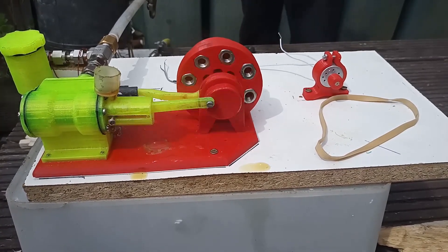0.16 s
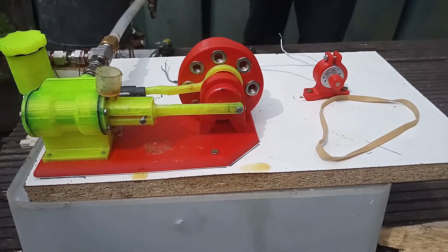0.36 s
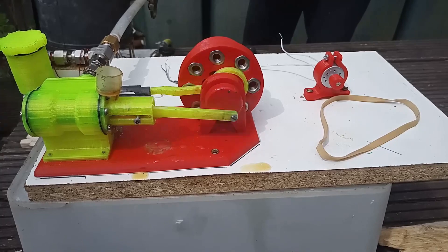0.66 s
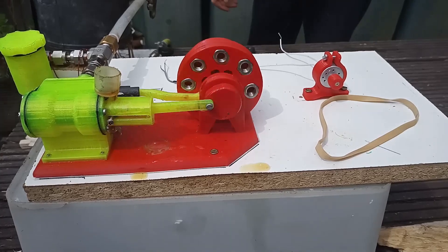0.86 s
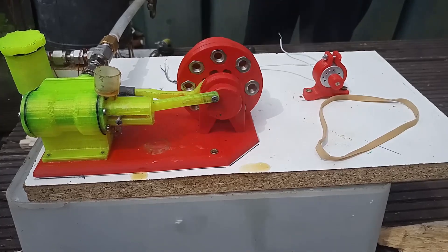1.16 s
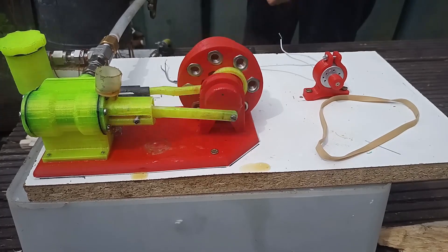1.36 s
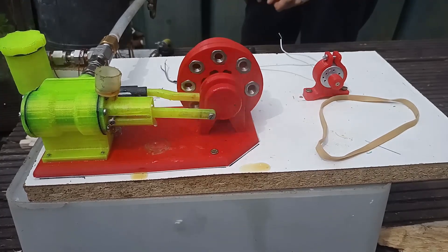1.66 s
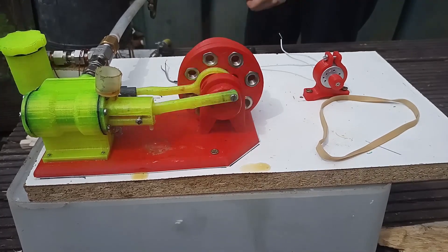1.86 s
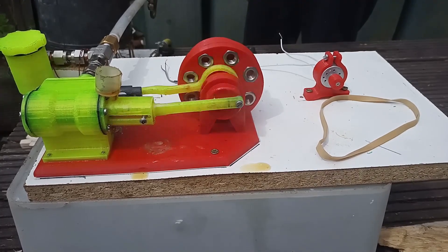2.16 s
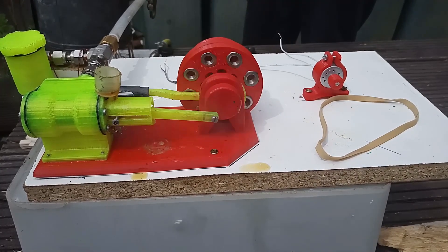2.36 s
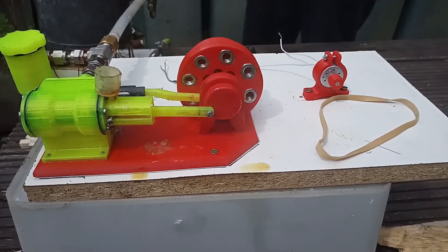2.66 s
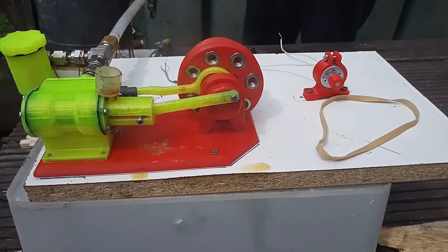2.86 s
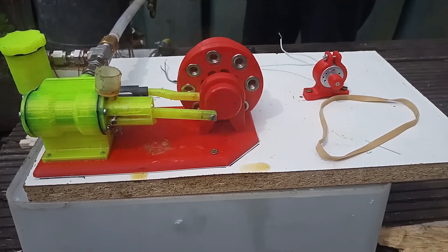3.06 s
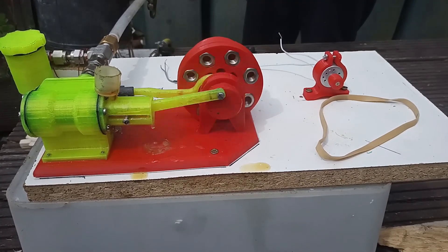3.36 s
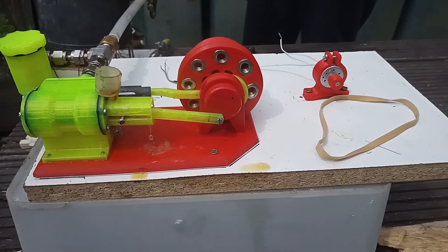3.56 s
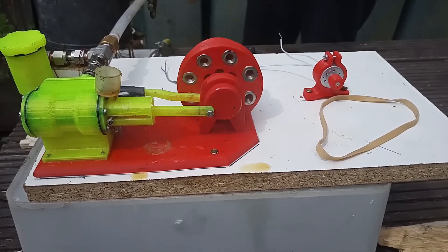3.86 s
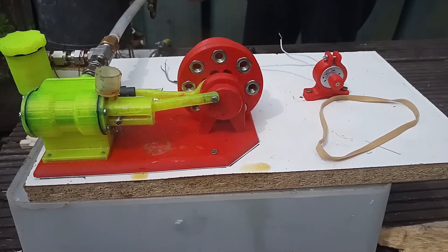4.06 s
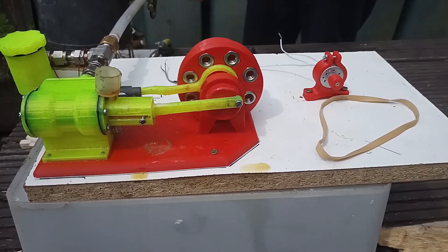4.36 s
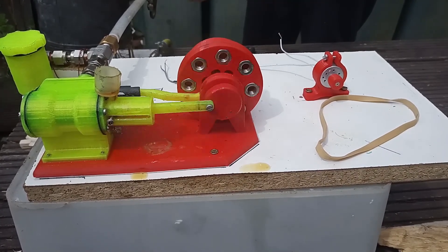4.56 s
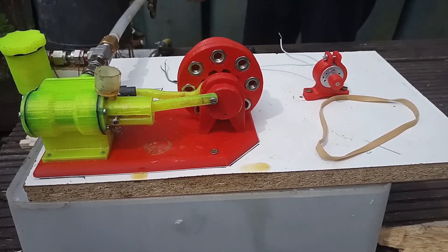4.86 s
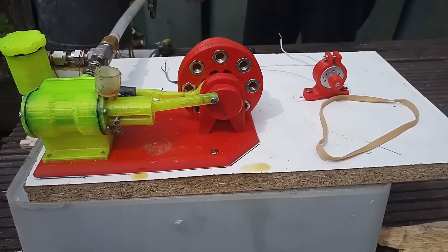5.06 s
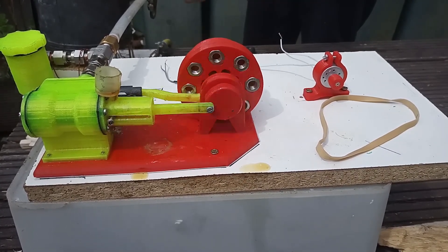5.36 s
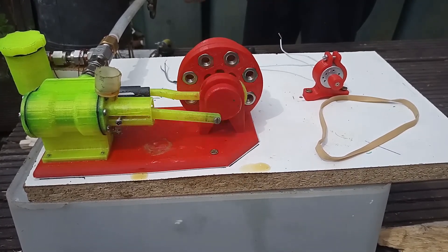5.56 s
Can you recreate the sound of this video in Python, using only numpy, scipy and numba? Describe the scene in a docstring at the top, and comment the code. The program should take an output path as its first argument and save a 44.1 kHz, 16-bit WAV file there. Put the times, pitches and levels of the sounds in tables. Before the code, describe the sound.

Quick, even puffs of wet hissing steam come from a small engine on a board, along with soft piston rubbing and rattling rods. The rhythm drags and breaks off for a moment, exposing a steady leak and a thin high whistle. A short hollow whoosh follows and the puffing starts again. It is heard from close by in the open air, with soft low wind bumps on the microphone.

```python
"""Small steam engine nearly stalling

A single-cylinder engine runs on a board at about seven turns a second, slows, nearly stalls
and picks up again. Once a turn the valve opens: a thin bright jet, then a wet sputtering rush.
The piston rubs and the loose linkage knocks at fixed crank angles.
A leak hisses all the time, and moving air rumbles on the microphone."""
import sys
import numpy as np
from scipy import signal
from scipy.fft import rfft, irfft
from scipy.io import wavfile
from scipy.ndimage import uniform_filter1d
from numba import njit

SR = 44100
rng = np.random.default_rng(int(sys.argv[2]) if len(sys.argv) > 2 else 0)


def inscribe(sig):
    """Save sig as 16-bit PCM at rate SR to the path in sys.argv[1].

    A 1-D sig is mono; a 2-D sig holds one channel per row.
    Samples are clipped to [-1, 1] before scaling.
    """
    pcm = np.round(np.clip(np.atleast_2d(sig).T, -1, 1) * 32767)
    wavfile.write(sys.argv[1], SR, pcm.astype(np.int16))


N = 252252
TIME = np.arange(N) / SR


def from_db(db):
    """Decibels to gain."""
    return 10 ** (np.asarray(db) / 20)


def unit_rms(x):
    """Scale to rms 1."""
    return x / np.sqrt(np.mean(x ** 2) + 1e-20)


def gain_along(rows_db, where):
    """Gain interpolated from rows of (position, level [dB])."""
    return from_db(np.interp(where, *np.transpose(rows_db)))


def butter(x, order, hz, kind):
    """Butterworth low- or high-pass."""
    return signal.sosfilt(signal.butter(order, hz, kind, fs=SR, output="sos"), x)


def noise(spectrum):
    """Noise of a given spectrum, falling 20 dB an octave beyond its ends; rms 1."""
    hz, db = np.transpose(spectrum)
    octave, points = np.log2(np.arange(N // 2 + 1) * SR / N + 1), np.log2(hz)
    outside = np.abs(octave - np.clip(octave, points[0], points[-1]))
    shape = from_db(np.interp(octave, points, db) - 20 * outside)
    return unit_rms(irfft(rfft(rng.standard_normal(N)) * shape, N))


def flutter(rate_hz, depth_db):
    """Factor wandering at random about 1."""
    r = np.exp(-2 * np.pi * rate_hz / SR)
    slow = signal.lfilter([1], [1, -2 * r, r * r], rng.standard_normal(N + SR))[SR:]
    return from_db(depth_db * unit_rms(slow))


def grains(per_s, spread_db):
    """Random clicks of uneven size and sign."""
    clicks = (rng.random(N) < per_s / SR) * rng.choice([-1, 1], N)
    return clicks * from_db(spread_db * np.minimum(rng.exponential(1, N), 4))


def impulses(times_s, sizes):
    """Single clicks at the given times."""
    out = np.zeros(N)
    inside = (times_s > 0) & (times_s < TIME[-1])
    out[(times_s[inside] * SR).astype(int)] = sizes[inside]
    return out


def bursts(clicks, length_s):
    """Each click becomes a rounded burst of noise."""
    shape = np.sin(np.pi * np.minimum(TIME[:SR // 20] / length_s, 1)) ** 2
    return signal.fftconvolve(clicks, shape)[:N] * rng.standard_normal(N)


def ring(clicks, hz, t60_s):
    """Each click starts a decaying sine."""
    r, w = np.exp(-np.log(1000) / (t60_s * SR)), 2 * np.pi * hz / SR
    return signal.lfilter([0, np.sin(w)], [1, -2 * r * np.cos(w), r * r], clicks + 1e-18)


def resonate(x, modes):
    """Parallel resonances of alternating sign."""
    out = 0
    for k, (hz, width_hz, db) in enumerate(modes):
        r = np.exp(-np.pi * width_hz / SR)
        poles = [1, -2 * r * np.cos(2 * np.pi * hz / SR), r * r]
        band = (1 - r * r) / 2 * signal.lfilter([1, 0, -1], poles, x + 1e-18)
        out = out + (-1) ** k * from_db(db) * band
    return out


@njit
def glide(x, angle, r):
    """Resonance with a moving centre, angle in radians a sample."""
    out = np.zeros(len(x))
    for i in range(2, len(x)):
        drive = (1 - r * r) / 2 * (x[i] - x[i - 2])
        out[i] = drive + 2 * r * np.cos(angle[i]) * out[i - 1] - r * r * out[i - 2]
    return out


def hollow(x, hz, width_hz):
    """Twice through a moving resonance; rms 1."""
    angle, r = 2 * np.pi * hz / SR, np.exp(-np.pi * width_hz / SR)
    return unit_rms(glide(glide(x, angle, r), angle, r))


def buffet(start_s, db, hz, rise_s=0.0064):
    """A lump of air: a few slow swings that swell and die."""
    age_s = np.maximum(TIME - start_s, 0)
    swell = age_s / rise_s * np.exp(1 - np.minimum(age_s / rise_s, 20))
    return from_db(db) * swell * np.sin(2 * np.pi * hz * age_s)


# rumble spectrum: (frequency [Hz], relative density [dB])
WIND_SPECTRUM = [(20, -34), (40, -1.5), (70, 4.5), (95, -1), (135, 0), (190, -10.5), (280, -28), (420, -12)]
# breeze strength: (time [s], relative level [dB])
WIND_LEVEL = [(0, -40.5), (.12, -43.5), (.23, -69), (.32, -51.5), (.8, -48.5), (1.03, -70), (1.26, -68),
              (1.39, -45), (1.8, -52.5), (2.15, -53), (2.68, -62), (2.86, -55.5), (3.18, -54.5),
              (3.7, -67.5), (4.1, -68.5), (4.42, -59), (4.9, -62), (5.72, -48.5)]
# single buffets: (time [s], relative peak [dB], pitch [Hz])
WIND_BUFFETS = [(0.021, -38.5, 124), (0.084, -34.5, 73.5), (0.108, -35.5, 104), (0.284, -40.5, 82),
                (0.432, -38, 95), (0.519, -41, 75.4), (0.713, -40.5, 93), (1.614, -48, 80.7),
                (1.97, -41, 91.5), (2.054, -38, 116), (2.081, -34, 77), (2.801, -44, 84.5),
                (3.118, -42, 78.1), (3.466, -41, 73.4), (4.204, -43, 69), (4.372, -41.5, 70.6),
                (4.601, -41.5, 105), (4.635, -37.5, 86.1), (4.92, -47.5, 109), (5.011, -34, 83),
                (5.096, -31.5, 101), (5.16, -37, 68.4), (5.493, -38.5, 64.6)]


def wind():
    """Air on the microphone: lumpy low rumble and single buffets."""
    thumps = from_db(-1) * sum(buffet(*row) for row in WIND_BUFFETS)
    gusts = from_db(-1.5) * gain_along(WIND_LEVEL, TIME)
    rumble = gusts * noise(WIND_SPECTRUM) * flutter(rate_hz=4.3, depth_db=3)
    return butter(butter(rumble + thumps, 4, 240, "low"), 2, 38, "high")


# hiss spectrum: (frequency [Hz], relative density [dB])
LEAK_SPECTRUM = [(600, -31.5), (1550, -39), (1870, -22), (2130, -26.5), (2600, -9), (3300, -8), (4100, 2),
                 (5000, -3), (6200, -10), (7200, -21), (8600, -45), (10500, -25), (15500, -39)]
# faint whistles: (frequency [Hz], width [Hz], gain per pass [dB])
LEAK_MODES = [(1887, 110, -6), (3230, 44, 1.5), (3530, 98, 0.7), (4027, 110, 3)]


def leak():
    """Steam escapes steadily from the fittings."""
    hiss = from_db(-50) * noise(LEAK_SPECTRUM)
    whistles = unit_rms(resonate(resonate(rng.standard_normal(N), LEAK_MODES), LEAK_MODES))
    return (hiss + from_db(-57.5) * whistles) * flutter(rate_hz=8.4, depth_db=1)


# sizzle past the valve: (time [s], level [dB])
SEEP_LEVEL = [(4.6, -83), (4.66, -68), (4.9, -64.5), (4.97, -64), (5.15, -62), (5.3, -61), (5.36, -81)]
# valve gap resonances: (frequency [Hz], width [Hz], gain [dB])
SEEP_MODES = [(8500, 890, 0), (9450, 900, 0), (13000, 3600, -10)]
# thin whistle: (time [s], level [dB], pitch [Hz])
SEEP_WHISTLE = [(4.85, -85, 8700), (4.94, -73, 8650), (4.975, -61, 8500), (5.04, -75, 8250),
                (5.13, -70, 8600), (5.28, -90, 8600)]


def seep():
    """Steam sizzles and whistles past the valve while the piston is nearly still."""
    sizzle = butter(resonate(grains(per_s=2900, spread_db=-1), SEEP_MODES), 2, 5000, "high")
    times_s, db, hz = np.transpose(SEEP_WHISTLE)
    whistle = hollow(rng.standard_normal(N), np.interp(TIME, times_s, hz), width_hz=530)
    whistle *= from_db(np.interp(TIME, times_s, db))
    return gain_along(SEEP_LEVEL, TIME) * unit_rms(sizzle) + whistle


# base and board resonances: (frequency [Hz], width [Hz], gain per pass [dB])
BOARD_MODES = [(257.2, 74, 0.5), (332.6, 81, -1), (495, 102, -5.5), (707, 153, -4.5), (1820, 930, -5.5),
               (3000, 1250, -6.5)]
# board rumble at normal speed: (time [s], relative level [dB])
BOARD_LEVEL = [(0, -52.5), (.28, -66), (.5, -56.5), (.78, -62.5), (1.3, -55), (1.65, -55.5), (2.0, -57),
               (2.2, -64.5), (2.85, -54), (3.6, -57.5), (4.1, -60.5), (4.5, -58.5), (5.4, -51),
               (5.72, -62.5)]


def rubbing(turns, speed, pressure_db):
    """Tiny slips of piston and slides ring the board and the hollow cylinder body."""
    pace = uniform_filter1d(speed, size=4000)
    sliding = np.minimum(pace / 0.43, 1) ** 7.1   # a slow piston sticks and falls quiet
    load = gain_along([(0, -1.5), (.35, -2.5), (.68, 2), (.8, -6.5), (1, -13)], turns % 1)
    load **= 1 / np.clip(pace, .5, 1)   # deeper lulls on slow turns
    board = unit_rms(resonate(resonate(grains(per_s=2500, spread_db=2.5), BOARD_MODES), BOARD_MODES))
    board *= gain_along(BOARD_LEVEL, TIME) * pace ** 2.03
    barrel_hz = 939 * flutter(rate_hz=9, depth_db=.4)
    barrel = hollow(grains(per_s=2800, spread_db=4.5), barrel_hz, width_hz=112)
    barrel *= from_db(-58 + .5 * pressure_db) * flutter(rate_hz=40, depth_db=1.5)
    return sliding * load * (board + barrel)


def contacts(turns, speed, phase, jitter_s, spread_db):
    """One blow a turn at a crank phase, softer below normal speed."""
    due_turns = np.arange(-1, np.ceil(turns[-1])) + phase
    timing, strength = rng.standard_normal((len(due_turns), 2)).T
    times_s = np.interp(due_turns, turns, TIME) + jitter_s * timing
    force = np.interp(times_s, TIME, np.minimum(speed, 1)) ** 3.7
    reached = (due_turns > turns[0]) & (due_turns < turns[-1])
    return impulses(times_s, force * reached * from_db(spread_db * strength))


# play in the linkage: (crank phase [turns], relative level [dB], pitch [Hz], t60 [s])
LINKAGE_KNOCKS = [(.06, -44.5, 1683, 0.03), (0.115, -48.5, 955, 0.038), (.185, -39, 1940, 0.016),
                  (0.298, -48, 288, 0.032), (0.37, -51, 2830, 0.019), (0.52, -58, 605, 0.02),
                  (0.585, -47.5, 260, 0.018), (0.575, -48, 1846, 0.048), (.64, -44.5, 914, 0.022),
                  (0.656, -51.5, 680, 0.038), (0.755, -51.5, 580, 0.048), (0.851, -47, 1523, 0.038),
                  (.885, -51, 900, 0.022), (.89, -53.5, 572, 0.022)]
# valve gear scrapes: (crank phase [turns], relative level [dB])
GEAR_SCRAPES = [(.65, -7.5), (.76, -16), (0.835, -0.5)]
# valve gear resonances: (frequency [Hz], width [Hz], gain [dB])
GEAR_MODES = [(3040, 580, 3), (4550, 660, 5), (6200, 1100, 1.5), (9660, 720, -3), (12500, 3600, -16)]


def linkage(turns, speed):
    """Rod and eccentric take up their play with dull knocks; the valve gear ticks."""
    knocks = taps = 0
    for phase, db, hz, t60_s in LINKAGE_KNOCKS:
        blows = contacts(turns, speed, phase, jitter_s=0.0024, spread_db=2)
        knocks += from_db(db) * ring(blows, hz, t60_s)
    for phase, db in GEAR_SCRAPES:
        taps += from_db(db) * contacts(turns, speed, phase, jitter_s=0.0005, spread_db=2.2)
    ticks = resonate(bursts(taps, length_s=0.0093), GEAR_MODES)
    return from_db(-0.2) * knocks + from_db(-36) * ticks


# steam filling the cylinder: (time [s], relative level [dB])
INTAKE_LEVEL = [(0, -59), (1.4, -59.5), (3.5, -61.5), (4.05, -61), (4.3, -71), (4.6, -78), (5.2, -38),
                (5.3, -57), (5.42, -55), (5.65, -59)]


def intake(turns, lead_s=0.0337):
    """Steam enters just before each puff; the cavity's pitch falls as the piston draws back."""
    phase = np.interp(TIME + lead_s, TIME, turns) % 1
    # (phase [turns], cavity pitch [Hz], relative level [dB])
    at, hz, db = np.transpose([(0, 1670, -16), (.03, 1730, -2), (.22, 1670, -3), (.34, 1080, 1),
                               (.55, 960, -1), (.62, 780, 6.5), (.68, 700, -54), (1, 1610, -60)])
    cavity_hz = np.interp(phase, at, hz) * flutter(rate_hz=39, depth_db=1)
    cavity = hollow(rng.standard_normal(N), cavity_hz, width_hz=800)
    return gain_along(INTAKE_LEVEL, TIME) * from_db(np.interp(phase, at, db)) * cavity


# exhaust port resonances: (frequency [Hz], width [Hz], gain [dB])
PORT_MODES = [(4060, 410, -17), (4776, 374, 6), (5690, 780, -3), (6450, 210, 1.5), (9700, 8100, -16.5)]


def sputter(phase):
    """Droplets of condensate burst in the port and set it ringing."""
    wetness = gain_along([(0, -9.5), (.27, -1.5), (.39, 5), (.555, 3), (.625, -15),
                          (.64, -17), (1, -59)], phase)
    return wetness * unit_rms(resonate(grains(per_s=2500, spread_db=2.5), PORT_MODES))


# larger drops: (time [s], relative peak [dB])
PORT_DROPS = [(0.7186, -27), (1.2284, -22.5), (1.2865, -27), (1.4681, -30), (1.5584, -22), (1.89, -23),
              (2.8942, -24), (3.265, -22), (4.6074, -23.5), (5.4197, -25), (5.4306, -27)]


def drops():
    """Now and then a larger drop snaps out of the port."""
    times_s, db = np.transpose(PORT_DROPS)
    snaps = resonate(impulses(times_s, from_db(db)), PORT_MODES)
    return from_db(db.max() - 2) * snaps / np.abs(snaps).max()


# valve slit resonances: (frequency [Hz], width [Hz], gain [dB])
SLIT_MODES = [(6200, 720, -3), (8820, 600, 1.5), (10600, 600, -6)]


def slit(phase):
    """The valve hisses as it cracks open and again as it shuts, 0.6 turn later."""
    edges = gain_along([(0, -37), (.013, -2), (.1, -6), (.3, -37), (.565, -13.5), (.605, -2),
                        (.63, -24), (1, -38)], phase)
    return edges * unit_rms(resonate(rng.standard_normal(N), SLIT_MODES))


# whistles of the narrow jet: (frequency [Hz], width [Hz], gain [dB])
JET_MODES = [(8450, 1000, -22), (9880, 1300, 5.5), (12730, 140, 11.5), (13500, 410, 3), (13600, 310, -11),
             (14100, 750, 1), (16000, 860, 2.5)]


def jet(phase):
    """A thin hiss falls in pitch as the opening widens, over steady whistles."""
    narrow = gain_along([(0, -28), (.05, -16), (.085, 0), (.25, 0.5), (.34, -5), (.57, -18),
                         (.63, -50), (1, -24)], phase)
    sweep_hz = np.interp(phase, [.05, .2, .35, .55], [13500, 12250, 10400, 9500])
    sweep_hz /= flutter(rate_hz=4.1, depth_db=0.64)
    sweep = hollow(rng.standard_normal(N), sweep_hz, width_hz=2400)
    whistles = unit_rms(resonate(rng.standard_normal(N), JET_MODES))
    return narrow * unit_rms(whistles + from_db(-3.5) * sweep) * flutter(rate_hz=55, depth_db=2.5)


# exhaust rush spectrum: (frequency [Hz], relative density [dB])
RUSH_SPECTRUM = [(500, -49), (700, -23), (950, -4), (1270, -12.5), (1650, -1), (2500, -10), (3600, -7),
                 (4800, -0.5), (6400, -0.5), (7300, -9), (9300, -10), (11500, -18.5)]


def rush(phase, pace):
    """Broad noise of outflowing steam, growing with speed."""
    flow = gain_along([(0, -10.5), (.03, -2.5), (.12, -1.5), (.33, -6), (.4, -4), (.595, -4),
                       (.645, -10.5), (.72, -15.5), (1, -14.5)], phase)
    return pace ** 0.57 * flow * noise(RUSH_SPECTRUM) * flutter(rate_hz=270, depth_db=3)


def exhaust(turns, speed, pressure_db, lead_turns=.014):
    """Dry steam whistles through the narrow opening first; the piston then pushes out wet steam."""
    phase = (turns + lead_turns) % 1
    pace = uniform_filter1d(speed, size=1500)
    dry_db = -45.5 + .5 * pressure_db
    broad = from_db(dry_db + 2) * rush(phase, pace)
    thin = from_db(dry_db - 1.34) * jet(phase) + from_db(dry_db + 2.5) * slit(phase)
    wet = from_db(-44 + pressure_db) * sputter(phase)
    bright = butter(thin + wet, 2, 2600, "high")   # a small port radiates little bass
    return (broad + bright) * np.minimum(pace / 0.42, 1)   # a resting piston pushes nothing out


# flywheel travel: (time [s], angle [turns])
CRANK_TURNS = [(-.1, -1), (.031, 0), (.43, 3), (1.149, 8), (1.955, 14), (2.533, 18), (2.955, 21),
               (3.219, 23), (3.597, 26), (3.87, 28), (4.02, 29), (4.2, 30), (4.331, 30.6), (4.441, 31),
               (4.646, 31.6), (5.297, 32), (5.447, 32.6), (5.552, 33), (5.79, 34)]


def crank():
    """Turns made so far, and speed relative to normal running."""
    turns = np.interp(TIME, *np.transpose(CRANK_TURNS))
    speed = np.gradient(turns)
    return turns, speed / np.median(speed)


def room(x, t60_s, wet_db):
    """A short faint tail from nearby surfaces."""
    t = TIME[:SR // 2]
    tail = rng.standard_normal(len(t)) * np.exp(-np.log(1000) * t / t60_s) * (t > .003)
    tail = butter(tail, 1, 5000, "low")
    return x + from_db(wet_db) * signal.fftconvolve(x, tail / np.sqrt(np.sum(tail ** 2)))[:N]


# steam supply about its mean: (time [s], level [dB])
SUPPLY_PRESSURE = [(0, -2), (.75, -0.5), (1.3, 3), (1.8, -3), (2.4, 0.5), (3.0, 0.3), (3.4, 1.3),
                   (3.65, -1), (4.1, -5.5), (4.55, -3.5), (5.35, 2.2), (5.7, -1.5)]


def scene():
    """Crank and steam pressure drive the engine; leak and wind go on regardless."""
    turns, speed = crank()
    pressure_db = np.interp(TIME, *np.transpose(SUPPLY_PRESSURE))
    steam = intake(turns) + exhaust(turns, speed, pressure_db) + drops()
    engine = steam + linkage(turns, speed) + rubbing(turns, speed, pressure_db)
    return (room(engine, t60_s=0.16, wet_db=-16) + leak() + seep() + wind())[None]


def record(dry, cutoff_hz=15750):
    """Steep low-pass."""
    return signal.sosfilt(signal.ellip(12, .1, 80, cutoff_hz, fs=SR, output="sos"), dry)


dry = scene()
out = record(dry)
inscribe(out)
```